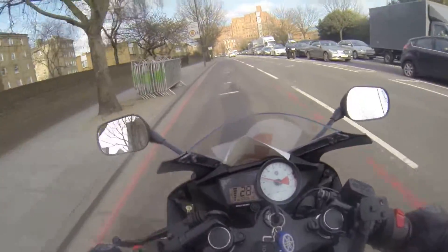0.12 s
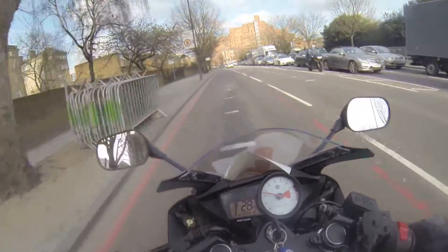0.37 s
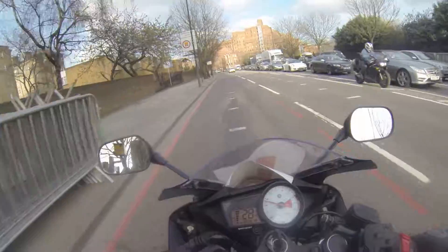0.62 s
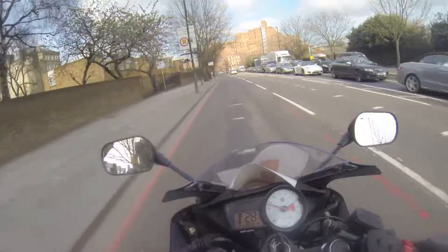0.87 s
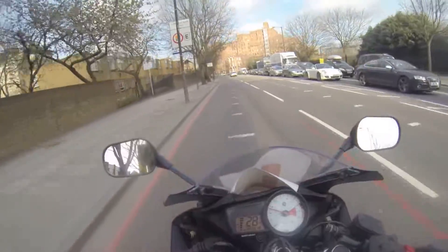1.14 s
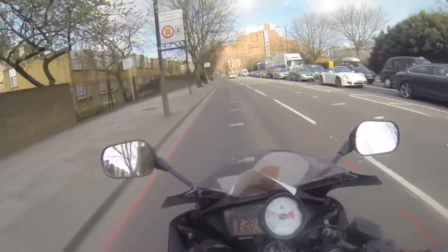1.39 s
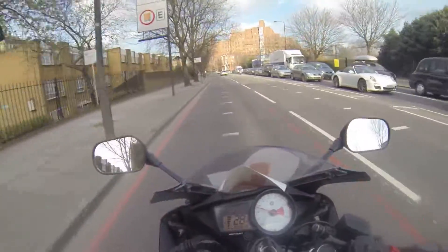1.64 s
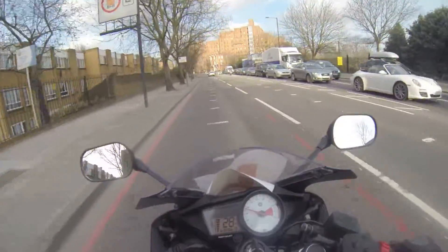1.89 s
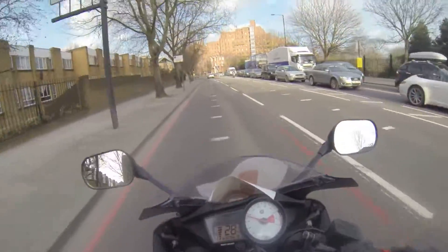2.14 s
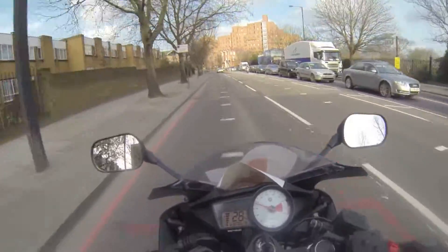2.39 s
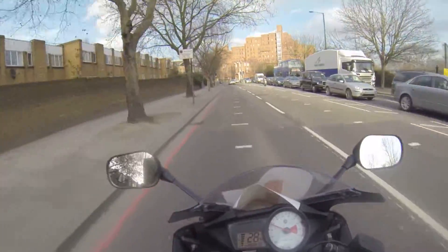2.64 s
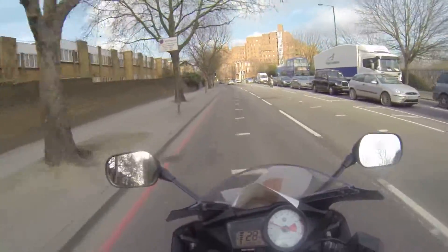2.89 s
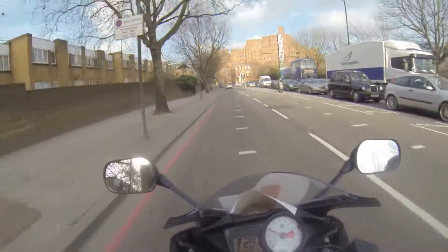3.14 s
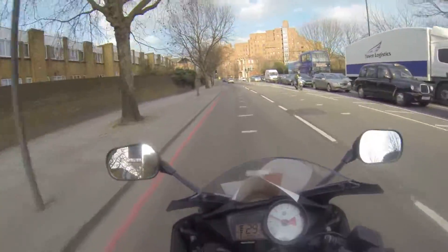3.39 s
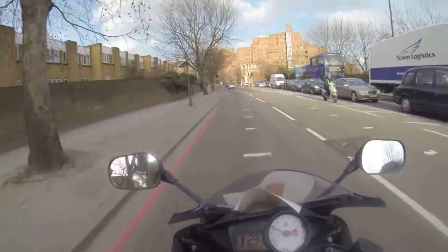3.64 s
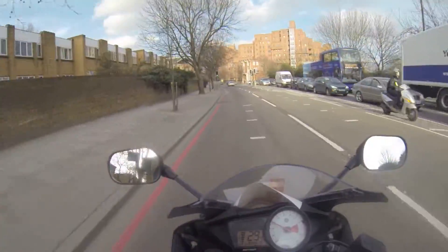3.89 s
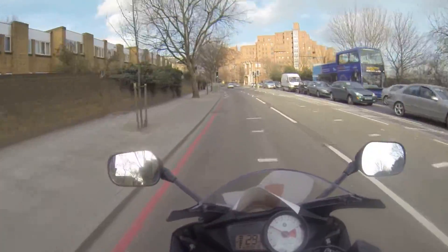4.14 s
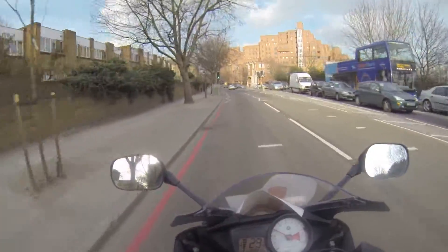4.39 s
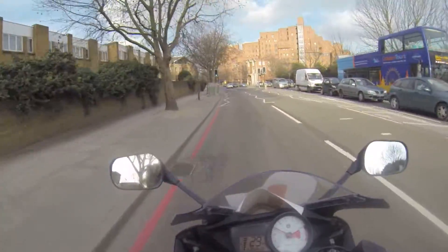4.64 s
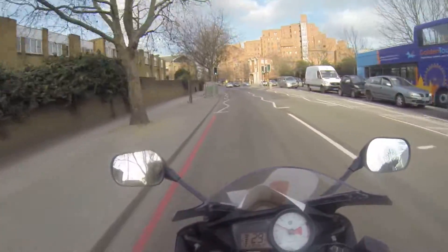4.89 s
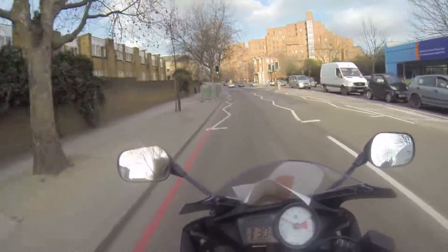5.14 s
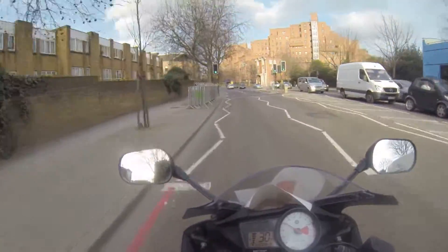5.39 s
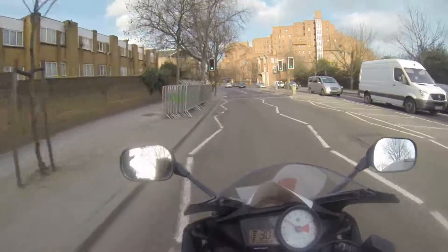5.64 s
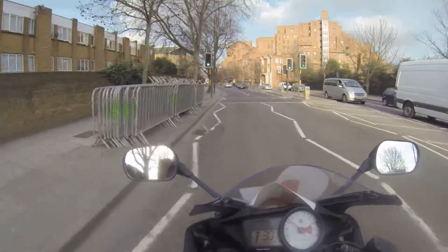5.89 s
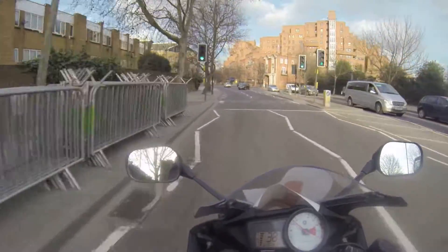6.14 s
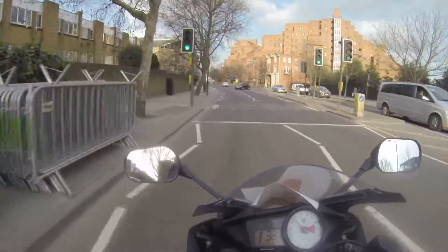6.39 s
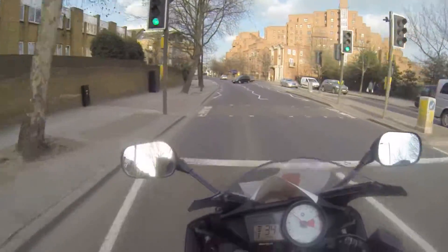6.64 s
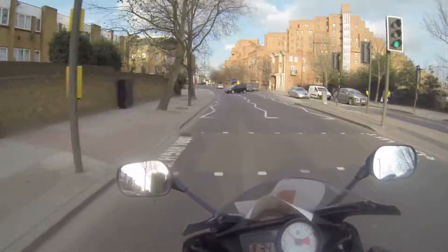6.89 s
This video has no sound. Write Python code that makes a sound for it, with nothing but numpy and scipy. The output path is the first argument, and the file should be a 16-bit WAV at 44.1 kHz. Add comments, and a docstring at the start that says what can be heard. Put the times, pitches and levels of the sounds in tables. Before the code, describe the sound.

A small motorcycle cruises along a city road, its low buzzing engine, rattly clatter and thin whine heard from a boxy enclosed microphone on the rider's helmet. Wind rumbles and booms throughout, with sudden pressure thumps. Another engine passes early with a faint sinking hum. Near five seconds the throttle opens and the engine growls louder, rising slightly before easing off.

```python
"""A small single-cylinder motorcycle cruises, then opens its throttle, heard inside a closed housing on the
rider's helmet. The engine is a harmonic series of the firing rate, narrow whines and throbbing noise.
Wind is shaped noise with single big swings of pressure; tyre roar is steady noise; an oncoming engine is
three partials of sinking pitch. Gain control ducks everything at the biggest gusts."""
import sys
import numpy as np
from scipy import signal
from scipy.fft import rfft, irfft, next_fast_len
from scipy.io import wavfile
from scipy.ndimage import uniform_filter1d

SR = 44100
rng = np.random.default_rng(int(sys.argv[2]) if len(sys.argv) > 2 else 0)


def boost(x):
    """Linear amplitude factor 10**(x/20) for a level x in decibels (scalar or array-like)."""
    u = np.asarray(x, float) / 20
    return 10 ** u


def materialize(psi):
    """Save the field psi as 16-bit PCM at rate SR to the path in sys.argv[1].

    A 1-D psi becomes a single channel; in a 2-D psi each row is a channel.
    """
    bounded = np.clip(np.atleast_2d(psi).T, -1, 1)
    quanta = np.round(bounded * 32767).astype(np.int16)
    wavfile.write(sys.argv[1], SR, quanta)


N = 309582  # samples

# engine speed: (time [s], firing rate [Hz])
REVS = [(0, 37.4), (1, 37.55), (3.6, 39.58), (4.7, 40.08), (4.95, 41.3), (5.2, 41.72), (5.5, 42.8),
        (6.05, 45.16), (6.2, 45.38), (6.6, 44.38), (7.02, 43.96)]
CRUISE_HZ = 39  # firing rate at which the speed-dependent levels take their base value


def evened(x):
    """Normalisation: a signal divided by its root mean square has rms 1."""
    return x / np.sqrt(np.mean(x ** 2) + 1e-20)


def curves(rows):
    """Linear interpolation: each column is joined by straight lines in time."""
    times, *columns = np.transpose(rows)
    return [np.interp(np.arange(N) / SR, times, column) for column in columns]


def spectrum_gain(points, hz):
    """Spectral envelope: levels in dB joined on a log-frequency axis, returned as gain."""
    point_hz, level_db = np.transpose(points)
    return boost(np.interp(np.log(hz + 1), np.log(point_hz + 1), level_db))


def coloured(gain):
    """Spectral shaping: white noise filtered by gain(hz), with rms 1."""
    size = next_fast_len(N)
    spectrum = rfft(rng.standard_normal(size))
    hz = np.arange(size // 2 + 1) * SR / size
    return evened(irfft(spectrum * gain(hz), size)[:N])


def wander(seconds):
    """Low-pass randomness: white noise through two running means of the given length, with rms 1."""
    span = max(round(seconds * SR), 1)
    smooth = uniform_filter1d(rng.standard_normal(N), span)
    return evened(uniform_filter1d(smooth, span))


def housing(hz):
    """Resonance: modes of the closed shell add humps or dips to a transmission gain of 1."""
    # shell modes: (centre [Hz], width [Hz], lift [dB])
    modes = [(676, 100, 3), (1322, 70, 9.5), (1430.5, 101, 13.5), (1562.5, 121, 16), (1681, 59, 9),
             (1752, 157, 10), (2265, 200, 2.5), (2876, 410, 4), (3175, 260, 3.5), (3595, 110, 4.5),
             (3930, 96, 4), (4300, 100, 4), (4660, 31, 9.5), (4820, 63, 2), (4980, 490, 8.5), (5710, 92, 6),
             (6620, 160, 4.5), (7950, 100, 6.5), (8420, 190, 7), (10800, 50, -12.5), (10620, 710, 4.5)]
    return 1 + sum((boost(db) - 1) / (1 + (2 * (hz - centre) / width) ** 4) for centre, width, db in modes)


def passer():
    """Doppler effect: partials of an engine going by the other way sink together in pitch."""
    # oncoming engine: (time [s], frequency of the note [Hz], level [dB])
    passing = [(.55, 423, -73), (.72, 410, -43.5), (.9, 400, -45), (1.1, 385, -50), (1.35, 377.5, -46),
               (1.6, 376, -59), (1.9, 365, -85)]
    # its partials: (multiple of the note, relative level [dB])
    partials = [(.62, -4), (.82, -4.5), (1, -1)]
    hz, level_db = curves(passing)
    turns = np.cumsum(hz) / SR + .035 * wander(.025)  # the phase is a little unsteady
    note = sum(boost(db) * np.cos(2 * np.pi * k * turns) for k, db in partials)
    return np.sqrt(2) * boost(level_db) * note


def road():
    """Broadband contact noise: tyre roar passes through the resonances of the housing."""
    # tyre roar before the housing: (frequency [Hz], relative level [dB])
    tyre_spectrum = [(240, -25), (400, -3), (459, -14.5), (580, -4), (648, -1), (823, -11.5), (1200, -5),
                     (1560, -33), (2640, -120)]
    roar = coloured(lambda f: spectrum_gain(tyre_spectrum, f) * housing(f))
    level_db = -45.5 + 0.62 * wander(0.083)
    return boost(level_db) * roar


def add_gusts(rumble):
    """Damped pressure swing: each gust brings suction, then a push, then a fading oscillation."""
    # big gusts: (time [s], top of the envelope [dB], swing frequency [Hz])
    gusts = [(2.101, 2, 25), (3.008, -11.5, 28.8), (3.186, -4, 26.4), (3.316, 0.5, 25.1),
             (5.752, -6.5, 28.8), (6.367, -6, 26.4), (6.639, -4.5, 28.8)]
    t = np.arange(SR // 8) / SR
    for start, db, hz in gusts:
        grow = t * hz / 0.61  # reaches 1 at the top of the envelope
        strength = (grow * np.exp(1 - grow)) ** 1.8
        part = rumble[round(start * SR):][:len(t)]  # a view, so the rumble itself changes
        part *= 1 - .8 * np.sqrt(strength)  # the gust sweeps the smaller eddies away
        part -= boost(db) * strength * np.sin(2 * np.pi * hz * t)


def wind():
    """Turbulent flow: slow pressure rumble, gusts, boom of the helmet shell and whoosh past the edges."""
    # wind: (time [s], level of the pressure rumble [dB], level of the helmet boom [dB])
    wind_levels = [(0, -20.5, -24.5), (.6, -20, -26.5), (.8, -17, -21), (1.1, -24, -30), (1.4, -18, -27),
                   (2.1, -19.5, -26.5), (2.4, -18.5, -18), (2.7, -19.5, -19.5), (3, -13, -24.5),
                   (3.4, -16.5, -19.5), (3.9, -22, -27.5), (4.3, -18, -22.5), (4.8, -18, -25),
                   (5.1, -17.5, -24.5), (5.7, -19.5, -17), (6, -18.5, -23), (6.25, -15, -16),
                   (7.02, -14, -20)]
    # spectra of the three noises: (frequency [Hz], relative level [dB])
    rumble_spectrum = [(2.4, -37), (4.0, -6), (27, 5), (38, -0.5), (59, -17.5), (70, -10), (91, -42),
                       (150, -120)]
    boom_spectrum = [(29, -43), (50, -22), (54, -4.5), (102, -4), (135, 1), (149, -3.5), (167, -18),
                     (180, -13), (230, -12.5), (400, -120)]
    whoosh_spectrum = [(100, -30), (170, 2), (433, -17), (600, -18.5), (780, -25), (1320, -120)]
    rumble_db, boom_db = curves(wind_levels)
    hz, = curves(REVS)
    # whoosh gains 0.49 dB per dB of boom above -21.5 dB, and 0.38 dB per Hz of firing rate, so with speed
    whoosh_db = -33.5 + 0.49 * (boom_db + 21.5) + 0.38 * (hz - CRUISE_HZ)

    rumble_db = rumble_db + 2 * wander(0.051)  # chance swells [dB]
    rumble = boost(rumble_db) * coloured(lambda f: spectrum_gain(rumble_spectrum, f))
    add_gusts(rumble)
    boom = boost(boom_db + 0.57 * wander(0.072)) * coloured(lambda f: spectrum_gain(boom_spectrum, f))
    whoosh = boost(whoosh_db + 0.1 * wander(0.076)) * coloured(lambda f: spectrum_gain(whoosh_spectrum, f))
    return rumble + boom + whoosh


def clatter(hz, load):
    """Broadband impact noise: mechanical clatter grows with load and engine speed."""
    # clatter before the housing: (frequency [Hz], relative level [dB])
    clatter_spectrum = [(600, -21), (1000, -11.5), (1560, -4.5), (1990, -14.5), (2200, -9.5), (3300, -14),
                        (4150, -20), (5010, -23.5), (7000, -26.5), (10600, -37), (14000, -41.5),
                        (15000, -61)]
    level_db = -31 + 0.5 * load + 0.29 * (hz - CRUISE_HZ)
    return boost(level_db) * coloured(lambda f: spectrum_gain(clatter_spectrum, f) * housing(f))


def intake_roar(load):
    """Flow noise and reflection: roar rises as the throttle opens and swells briefly."""
    # intake roar before the housing: (frequency [Hz], relative level [dB])
    intake_spectrum = [(500, -20), (800, -11), (1350, -4), (1600, -3.5), (2000, -15.5), (2700, -12.5),
                       (4200, -22.5), (6500, -35), (15000, -65)]
    # swells, as when things by the kerb throw the roar back: (time [s], half length [s], level [dB rms])
    kerbside = [(.7, 0.26, -40), (2.5, 0.3, -36), (2.93, 0.031, -29), (3.15, .1, -55), (6.216, .06, -26),
                (6.51, 0.071, -24.5), (6.85, 0.2, -36)]
    shut_db, open_db = -50, -29.5
    t = np.arange(N) / SR
    direct = boost(shut_db + (open_db - shut_db) * load ** 0.18)
    thrown_back = sum(boost(db) * np.exp(-((t - middle) / half) ** 2) for middle, half, db in kerbside)
    roar = coloured(lambda f: spectrum_gain(intake_spectrum, f) * housing(f))
    return np.hypot(direct, thrown_back) * roar


def throb(turns):
    """Amplitude modulation: noise peaks at the firing and again, weaker, at the valve strokes."""
    phase = 2 * np.pi * turns
    throb_db = 0.77 * np.cos(phase) + 0.4 * np.cos(2 * phase + 0.49) + 0.38 * np.cos(3 * phase + 1.2)
    flutter_db = 0.34 * wander(0.0079) + 0.78 * wander(0.65)  # air eddies waver the path to the helmet
    return boost(throb_db + flutter_db)


def knocks(hz, load, turns):
    """Fourier series: high harmonics of the firing rate form one knock a cycle, coloured by the housing."""
    knock = np.zeros(N)
    for k in range(24, 60):
        shell = np.repeat(housing(k * hz[::256]), 256)[:N]
        level = shell * boost(-63.5 - 0.0768 * (k - 27))  # falls 0.0768 dB a harmonic before the housing
        # many parts strike through the cycle, so the phases are scattered
        scatter = .003 * k * k + .15 * rng.standard_normal()  # [cycles]
        knock += level * np.cos(2 * np.pi * (k * turns + scatter))
    return np.sqrt(2) * knock * boost(4 * load + 1.2 * wander(0.017))


def exhaust_and_whines(hz, load, turns):
    """Fourier series: harmonics form one exhaust pulse a cycle, and narrow whines stand near other multiples."""
    # exhaust harmonics 2 to 23 of the firing rate, cruising and under load: (level [dB rms])
    cruise_levels = [-34, -40.5, -42, -51, -50, -68, -50.5, -53.5, -59, -93, -57, -74, -75.5, -78, -65,
                     -63.5, -64, -67, -57, -80, -82, -61]
    load_levels = [-26, -32, -44, -45, -48, -43, -46, -48, -50, -57, -54, -58, -49, -53, -51, -58, -57, -65,
                   -57, -53, -55, -60]
    # narrow whines near multiples of the firing rate: gears, and a knock harmonic ringing in the housing:
    # (multiple of the firing rate, cruising level [dB rms], loaded level [dB rms],
    # firing rate where the cruising whine is strongest [Hz])
    whines = [(13.8, -56, -47, 39.6), (39.05, -43, -50, 39.9), (48.05, -58, -70, 39.3),
              (80, -59, -72, 37.9)]
    # silencer resonance, which lifts loaded levels that cross it: (centre [Hz], width [Hz], lift [dB])
    pipe_ring = (662, 50, 6)
    ring_hz, ring_width, ring_db = pipe_ring
    orders = list(zip(range(2, 24), cruise_levels, load_levels))
    for k, cruise_db, load_db, best_hz in whines:
        # a cruising whine loses 3.5 dB per Hz away from its strongest rate
        orders.append((k, cruise_db - 3.5 * abs(hz - best_hz), load_db))

    tones = np.zeros(N)
    for k, cruise_db, load_db in orders:
        load_db = load_db + ring_db / (1 + (2 * (k * hz - ring_hz) / ring_width) ** 2)
        level_db = cruise_db + load ** .6 * (load_db - cruise_db) + 2.5 * wander(.1)
        smear = 0.0595 * k * k  # phase bend of the pipe [rad]
        tones += boost(level_db) * np.cos(2 * np.pi * k * turns - smear)
    return np.sqrt(2) * tones


def engine():
    """Periodic excitation: exhaust, whines, knocks and throbbing noise share one firing phase."""
    # engine load: (time [s], load [0-1])
    load_curve = [(0, 0), (4.6, 0), (4.88, .15), (4.97, 1), (6.2, 1), (6.29, .6), (6.42, .6), (6.48, .7),
                  (6.58, .3), (7.02, .1)]
    hz, = curves(REVS)
    load, = curves(load_curve)
    turns = np.cumsum(hz) / SR + .002 * wander(.06)  # firings come a little early or late [cycles]
    pulses = exhaust_and_whines(hz, load, turns) + knocks(hz, load, turns)
    noises = clatter(hz, load) + intake_roar(load)
    return pulses + throb(turns) * noises


def scene():
    """Superposition: engine, road, traffic and wind pressures add at one microphone."""
    return (engine() + road() + passer() + wind())[None]


def roll_off(x):
    """The treble ends steeply here."""
    return signal.sosfilt(signal.butter(12, 15130, fs=SR, output="sos"), x)


def record(dry):
    """Dynamic range compression: gain falls within milliseconds on a peak, then recovers; tanh saturates."""
    peak_db = 20 * np.log10(abs(dry[0]) + 1e-9)
    fall_db = np.arange(N) * 54.0 / SR  # the held peak sinks by 54 dB a second
    held_db = np.maximum.accumulate(peak_db + fall_db) - fall_db
    over_db = np.maximum(held_db + 6.2, 0)  # excess above a threshold of -6.2 dB
    keep = np.exp(-1 / (.009 * SR))  # smoothing with a time constant of 9 ms
    duck_db = signal.lfilter([1 - keep], [1, -keep], 1.3 * over_db)  # 1.3 dB down per dB of excess
    mix = 0.57 * np.tanh(dry * boost(-duck_db) / 0.7)
    return roll_off(mix)


dry = scene()
out = record(dry)
materialize(out)
```